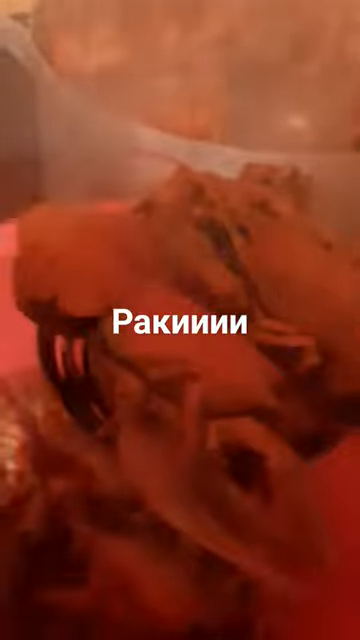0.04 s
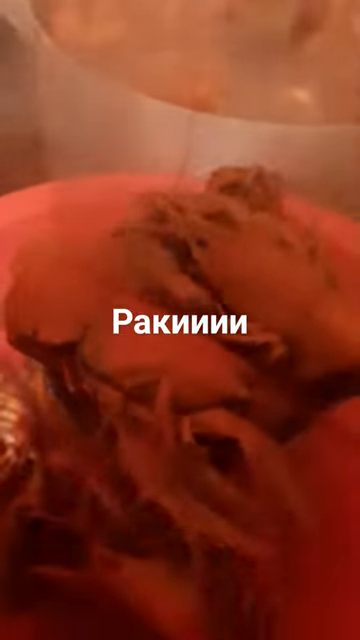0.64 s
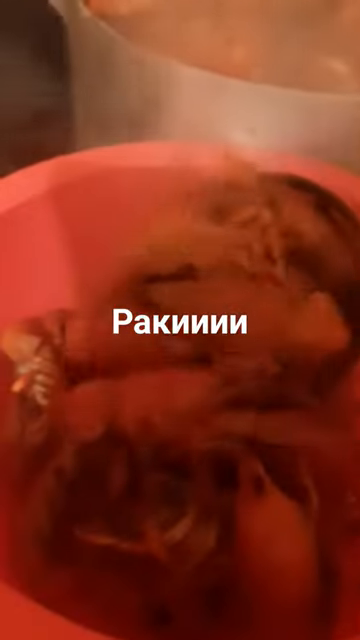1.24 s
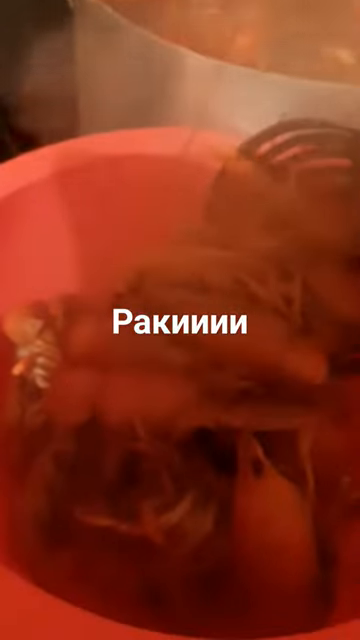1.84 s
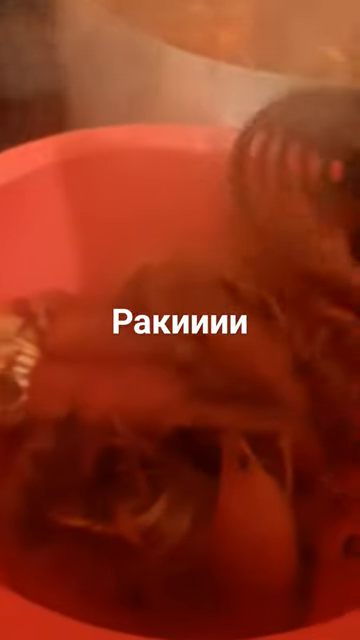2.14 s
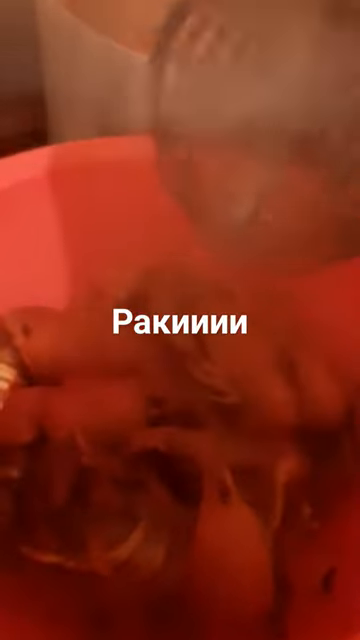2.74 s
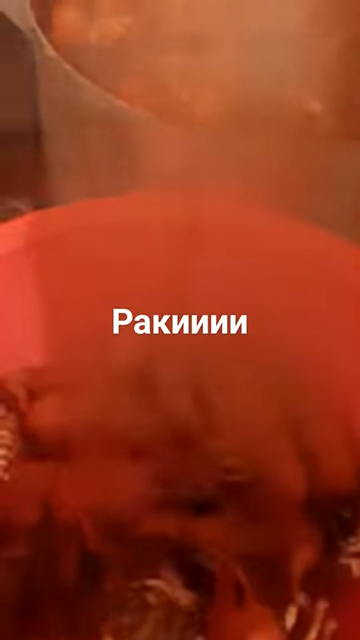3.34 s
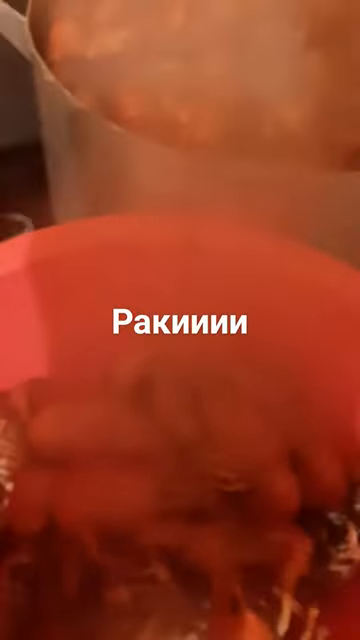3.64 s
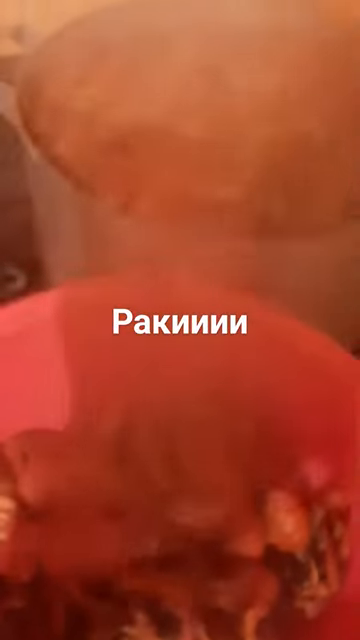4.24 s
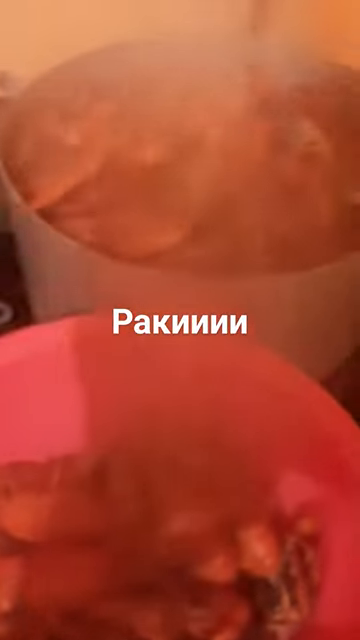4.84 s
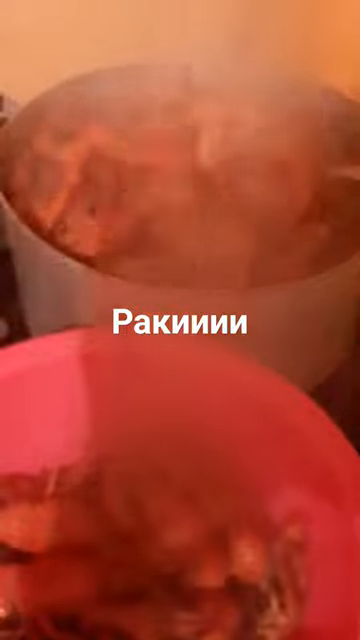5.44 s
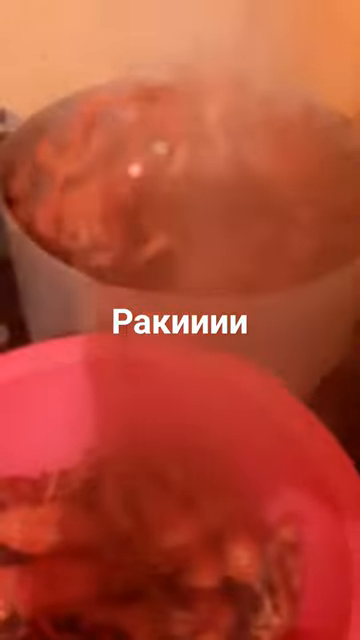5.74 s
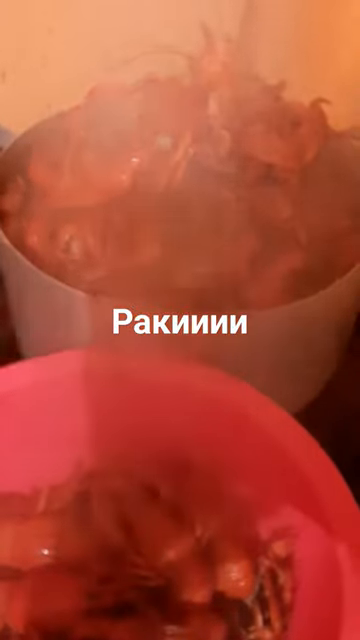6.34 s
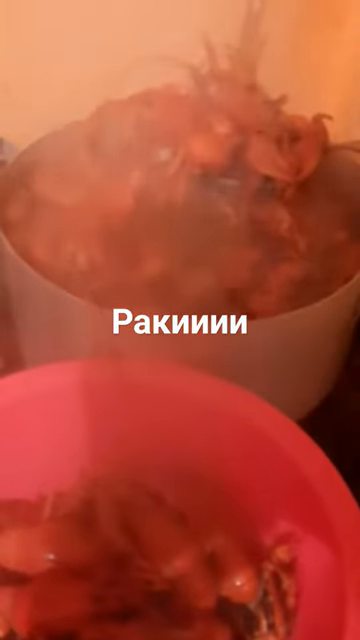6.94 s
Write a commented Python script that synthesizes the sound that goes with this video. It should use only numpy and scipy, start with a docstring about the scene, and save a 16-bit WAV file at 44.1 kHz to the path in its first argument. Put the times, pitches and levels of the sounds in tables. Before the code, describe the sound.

Crayfish shells knock sharply into a plastic bowl, followed by hollow bumps and soft wet rustling, with a stove rumbling faintly.

```python
"""A small kitchen, a stereo microphone close to a plastic bowl; a low mains hum and the stove's rumble run
throughout. First boiled crayfish slide off a steel skimmer, their wet shells rustling. They clatter into the
bowl in three bursts, one at 1.4 s and two close together near 2.4 s. From 3.4 s the loaded bowl is shifted and
bumps down a few times. Last, the skimmer digs into the pot for more, with softer rustles and ticks."""
import sys
import numpy as np
from scipy import signal
from scipy.fft import rfft, irfft
from scipy.io import wavfile
from scipy.ndimage import uniform_filter1d

SR = 44100
rng = np.random.default_rng(int(sys.argv[2]) if len(sys.argv) > 2 else 0)


def master(y):
    """Save y as 16-bit WAV."""
    cut = np.clip(np.atleast_2d(y).T, -1, 1)
    pcm = np.round(cut * 32767)  # scale
    wavfile.write(sys.argv[1], SR, pcm.astype(np.int16))


N = 317520  # 7.2 s


# Crayfish landing in the bowl, close to the microphone. Each row: start in seconds, level in dB,
# thud and crack in relative dB, shell pitch in Hz, weight on the bowl's floor in relative dB.
LANDINGS = [(1.416, -27.5, -11.5, -10.5, 1610, -28), (1.4224, -19.5, -10.5, -9, 1880, -27),
            (1.4266, -22, -4.5, -17.5, 1677, -25), (1.429, -22, -7.5, -9.5, 1604, -19),
            (1.457, -22, -16, -15.5, 1740, -25), (2.3465, -24, -5, -5, 1610, -10),
            (2.3593, -21.5, -2.5, 1, 1580, -9), (2.3737, -22, -5, -4, 1540, -11),
            (2.3955, -24.5, -6.5, -9, 1580, -13), (2.4034, -26, -6.5, -13, 1604, -14),
            (2.449, -36, -6, -15, 1200, -20), (2.4639, -24.5, -13, -20, 2060, -25),
            (2.4978, -22, -19, -9, 1816, -22.5), (2.5, -22, -20.5, -7.5, 1766, -17),
            (2.51, -23, -5.5, -10.5, 1868, -17), (2.5172, -34.5, -14.5, 2.5, 1550, -14)]
# The plastic bowl's modes. Each row: pitch in Hz, relative level in dB, time to fall 60 dB in seconds.
BOWL_MODES = [(344, 1, 0.25), (561, -2, .13), (687, -4.5, .11), (790, -3.5, 0.085), (950, -4.5, .09),
              (1250, -5.5, 0.15), (1520, 1, 0.2), (1594, -2.5, 0.09), (1900, -6.5, .1), (2043, -10.5, 0.11),
              (2780, -6, .12), (4000, -5.5, .15)]

def landings():
    """Falling crayfish strike the heap and set the bowl ringing; its floor sags under their weight."""
    hits, sag = np.zeros(N), np.zeros(N)
    for start, db, thud_db, crack_db, hz, weight_db in LANDINGS:
        add(hits, start, undb(db) * shell(thud_db, crack_db, hz))
        add(sag, start, undb(db + weight_db) * unit(band(crunch(0.12), 60, 240)))
    return hits + sag + undb(-26) * through(hits, ring(BOWL_MODES))


def shell(thud_db, crack_db, hz):
    """One contact: the hollow shell rings briefly over a knock, a soft thud and a snap."""
    modes = [(hz, 0, 0.018), (hz * 0.7, -6, 0.011), (hz * 1.22, -5, 0.012), (hz * 2.2, -9, 0.011)]
    hollow = unit(ring(modes))
    knock = unit(band(crunch(0.0099), 1000, 4000))
    thud = undb(-0.5) * unit(ring([(680, 0, 0.02)])) + undb(-3.5) * unit(band(crunch(0.023), 330, 900))
    return hollow + undb(-5) * knock + undb(thud_db) * thud + undb(crack_db) * crack(0.008)


def crack(t60):
    """The bright snap of hard shell."""
    return unit(band(crunch(t60), 3000, 21000))


# The bowl bumping down close by. Each row: start in seconds, level in dB, thud and crack in relative dB.
BOWL_BUMPS = [(3.367, -50.5, -1, 0.5), (3.388, -23.5, -1.5, -0.5), (3.392, -32.5, 4.5, -4.5),
              (3.404, -37, -5, -10), (3.531, -26, -8.5, 7), (3.5365, -24, 2, 5.5), (3.5426, -29, -7.5, -1),
              (3.5842, -20, 4, -19), (3.5908, -26.5, -8, 7), (3.6053, -20, -7, 1),
              (3.6112, -31.5, -2.5, -6), (3.8242, -26.5, 0, -4.5)]
# The loaded bowl's modes on its support.
# Each row: pitch in Hz, relative level in dB, time to fall 60 dB in seconds.
SUPPORT_MODES = [(122, -10, 0.25), (176, -7, 0.2), (210.4, 0, .23), (261.4, -7, 0.066), (325, -5, 0.058),
                 (402, 3, 0.14), (431.6, 2, 0.084), (516, -0.5, 0.085), (571, -8, 0.24), (771, -0.5, 0.1),
                 (857, -4, 0.093), (890, -4, 0.12)]

def bumps():
    """Heavy blows: the support booms, the bowl's wall knocks, and the heap crunches as it settles."""
    y, settle = np.zeros(N), 1 - fade(0.005)
    for start, db, thud_db, crack_db in BOWL_BUMPS:
        thud = unit(band(crunch(0.011), 200, 790)) + undb(0.3) * unit(ring(SUPPORT_MODES))
        wall = undb(-6) * unit(band(crunch(0.024), 1150, 1900))
        clack = unit(band(crunch(0.03), 1200, 5300)) + undb(crack_db) * crack(0.072)
        add(y, start, undb(db) * (undb(thud_db) * thud + wall + undb(1.5) * settle * clack))
    return y


# Single shells and legs snapping past each other.
# Each row: start in seconds, level in dB, scrape in relative dB, shell pitch in Hz.
SHELL_SLIPS = [(0.6967, -60, -3, 1200), (0.8958, -53.5, -1, 1520), (0.968, -41.5, -15, 1330),
               (0.9917, -46.5, -21, 970), (1.0928, -38.5, -6, 4000), (1.1152, -44, -8, 1430),
               (1.274, -44, 1, 3980), (1.3275, -47.5, -1, 1020), (1.7663, -55.5, 3, 1650),
               (1.856, -51.5, -4, 1030), (1.8931, -52, -4, 1010), (1.9331, -57, -5, 960),
               (2.1121, -46, 7, 4900), (2.2243, -43, 1, 1450), (2.278, -43, -8, 4500),
               (4.2739, -45, -22, 1020), (4.3225, -45, -7, 1580), (4.5651, -53, 2.5, 1540),
               (4.8826, -51, 0, 3670), (4.9072, -52, 12, 3830), (5.0406, -53.5, 1, 1060),
               (5.1303, -52, -3, 1590), (5.275, -44.5, 1, 1550), (5.3087, -47, 0, 1730),
               (5.3936, -52, -10, 4600), (5.4987, -55.5, 8, 1460), (5.6062, -42.5, -10, 1270),
               (5.909, -56, -8, 1405), (5.943, -64, 8, 4500), (6.015, -64, -14, 1490),
               (6.1454, -61, 4.5, 1600), (6.776, -66.5, 18, 1510)]

def slips():
    """A shell catches, snaps free with a hollow tick and scrapes on briefly."""
    y = np.zeros(N)
    for start, db, scrape_db, hz in SHELL_SLIPS:
        tick = unit(band(crunch(0.009), hz * 0.75, hz * 1.35))
        thud_db = 2.5 - 15.5 * np.log2(hz / 1040)  # big hollow parts thud, thin legs hardly do
        thud = undb(thud_db) * unit(band(crunch(0.016), 500, 950))
        scrape = undb(-4) * crack(0.007) + undb(-0.5) * crack(0.074)
        add(y, start, undb(db) * (tick + thud + undb(scrape_db) * scrape))
    return y


# Pushes that set the shells sliding.
# Each row: start, swell and time to fall 20 dB in seconds, rustle in dB, wet rubbing in dB.
HEAP_PUSHES = [(0.684, 0.024, .11, -65.5, -62), (0.884, 0.036, 0.28, -61.5, -55),
               (0.954, 0.0098, 0.15, -54.5, -50.5), (1.039, 0.022, 0.2, -56.5, -51),
               (1.18, 0.051, 0.33, -58.5, -51), (1.498, 0.012, 0.08, -53, -50),
               (1.669, 0.096, 0.59, -65.5, -65), (1.99, 0.15, 0.3137, -58, -56.5),
               (2.19, 0.13, 0.0418, -47, -47), (3.43, 0.06, 0.7, -51.5, -77), (3.64, .02, 0.1725, -47, -43),
               (3.729, 0.066, 0.0847, -51, -44), (3.89, 0.1, .5, -68.5, -59.5),
               (4.17, 0.071, 0.54, -59, -59), (4.76, 0.049, 0.66, -66, -59.5), (4.87, 0.01, 0.29, -57, -57),
               (5.125, 0.17, 0.26, -57.5, -53.5), (5.494, 0.033, 0.36, -55.5, -57),
               (5.585, 0.026, 0.01, -66, -54.5), (5.78, 0.093, 0.57, -75, -74.5),
               (6.525, 0.061, .24, -61, -78), (6.659, 0.026, 0.12, -62, -74),
               (6.775, 0.014, 0.8, -63.5, -73.5)]
# The shells' bright rustle. Each row: frequency in Hz, relative density in dB.
RUSTLE_SPECTRUM = [(900, -24), (1350, -8), (1550, 2), (1800, -4), (2570, -1), (3440, -1.5), (5150, -2),
                   (5800, -7), (7700, -6.5), (8750, -16), (10700, -6.5), (13900, -7), (15000, -9),
                   (16000, -17.5)]
# Their duller wet rubbing. Each row: frequency in Hz, relative density in dB.
RUBBING_SPECTRUM = [(150, -32), (350, 0.5), (470, -4), (620, 2), (850, -2.5), (1100, -4), (1330, -5.5),
                    (1560, 1.5), (1800, -8), (2600, -15.5)]

def sliding():
    """Wet shells rustle, rub and bubble as they move over each other."""
    rustle = colour(grains(1300, 3.4), RUSTLE_SPECTRUM) * undb(-2 + 2.2 * walk(35))
    water = bubbles(rate=31, cycles=13)
    rubbing = undb(-8.5) * (water + colour(grains(1100, 1.2), RUBBING_SPECTRUM))
    rustle_level = pushed((*timing, db) for *timing, db, _ in HEAP_PUSHES)
    rubbing_level = pushed((*timing, db) for *timing, _, db in HEAP_PUSHES)
    return rustle * rustle_level + rubbing * rubbing_level


def bubbles(rate, cycles, pitches=20):
    """Water pops between the shells, `rate` times a second at each pitch, ringing for `cycles` periods."""
    y, count = np.zeros(N), int(rate * N / SR)
    for hz in np.geomspace(380, 2400, pitches) * (1 + 0.023 * rng.standard_normal(pitches)):
        decay = np.exp(-np.log(1000) * hz / cycles / SR)
        turn = 2 * np.pi * hz / SR
        pops = np.zeros(N)
        pops[rng.integers(0, N, count)] = undb(5 * np.minimum(rng.exponential(size=count), 3.5))
        resonance = [1, -2 * decay * np.cos(turn), decay ** 2]
        y += signal.lfilter([np.sin(turn), -np.sin(turn)], resonance, pops + 1e-12)
    y = colour(y, RUBBING_SPECTRUM)
    return y / np.std(y)


# Shoves on the bowl or the pot. Each row: start, swell and time to fall 20 dB in seconds, level in dB.
VESSEL_SHOVES = [(3.39, 0.014, 0.4, -47.5), (3.6, 0.047, 0.4547, -48.5), (3.86, .05, 0.46, -54.5),
                 (4.17, 0.12, 0.34, -58.5), (4.76, 0.041, .4, -69), (5.15, 0.18, 0.02, -65),
                 (5.595, 0.016, 0.23, -66)]
# The low judder of its foot. Each row: frequency in Hz, relative density in dB.
JUDDER_SPECTRUM = [(53, -13.5), (90, 2), (160, 3.5), (210, 7), (285, -1.5), (411, 6), (470, -2), (625, -1),
                   (716, -12.5), (883, -6), (1100, -26.5), (2420, -51)]

def dragging():
    """The foot of the bowl or the pot judders over its support."""
    return colour(grains(500, 2.3), JUDDER_SPECTRUM) * pushed(VESSEL_SHOVES)


# Shells scraping off the skimmer above the bowl.
# Each row: start, swell and time to fall 20 dB in seconds, level in dB.
SKIMMER_SCRAPES = [(1.74, .03, .3, -76), (2.09, .03, 0.3, -62)]

def skimmer(hz=5000, width_hz=160):
    """Scraping keeps one narrow mode of the steel skimmer singing thinly."""
    singing = band(grains(900, 2.9), hz - width_hz / 2, hz + width_hz / 2)
    return singing / np.std(singing) * pushed(SKIMMER_SCRAPES)


# Thin whines behind the handling.
# Each row: start and length in seconds, first and last pitch in Hz, level in dB.
WHINE_GLIDES = [(3.69, 0.13, 905, 775, -49.5), (6.5, 0.214, 297, 314, -66), (6.557, 0.12, 922, 916, -80),
                (6.976, 0.25, 585, 538, -77)]

def whines():
    """Faint wavering tones that swell, glide and fade."""
    y = np.zeros(N)
    for start, length, first_hz, last_hz, db in WHINE_GLIDES:
        n = int(length * SR)
        hz = np.linspace(first_hz, last_hz, n) * (1 + 0.018 * walk(65)[:n])
        arch = np.sin(np.linspace(0, np.pi, n))
        add(y, start, undb(db) * arch * np.sin(2 * np.pi * np.cumsum(hz) / SR))
    return y


# The stove's rumble and hiss in the background. Each row: frequency in Hz, relative density in dB.
STOVE_SPECTRUM = [(25, -30), (42, -16), (53, -3), (68, -1.5), (90, -4.5), (130, -9.5), (260, -17),
                  (410, -15), (600, -26.5), (1200, -33), (1550, -27.5), (1900, -32), (9000, -38),
                  (15000, -30)]
# Mains hum in the room. Each row: pitch in Hz, level in dB.
MAINS_HUM = [(100, -72)]

def stove():
    """A throbbing low rumble and mains hum in the centre, with a faint hiss spread wide."""
    t = np.arange(N) / SR
    throb_spectrum = [(30, -46), (45, -10), (53, -4), (61, -6.5), (75, -16.5), (110, -31.5), (300, -88)]
    throb = undb(-70.5) * colour(rng.standard_normal(N), throb_spectrum) + swells()
    rumble = colour(rng.standard_normal(N), STOVE_SPECTRUM) * undb(-71 + 0.5 * walk(1.7))
    air = colour(rng.standard_normal(N), STOVE_SPECTRUM)
    side = undb(-75.5) * band(air, 700, 18000) + undb(-76.5) * air
    hum = sum(undb(db) * np.sqrt(2) * np.sin(2 * np.pi * hz * t + 0.22 * walk(2.1))
              for hz, db in MAINS_HUM)
    mid = throb + rumble + hum
    return np.array([mid + side, mid - side])


# Soft low booms rising out of the rumble. Each row: time of the peak in seconds, level in dB, pitch in Hz.
RUMBLE_SWELLS = [(0.33, -61.5, 65.1), (0.52, -57, 52.8), (0.74, -53, 64.8), (1.13, -63, 52.55),
                 (1.29, -60.5, 52.3), (1.47, -59.5, 53.35), (1.78, -58, 53.05), (2.1, -64, 52.7),
                 (2.37, -54.5, 60.9), (2.55, -56, 53.3), (3.63, -48, 57), (3.88, -48, 52.97),
                 (3.97, -49, 52.8), (4.14, -55.5, 53.8), (4.46, -59, 52.8), (4.57, -55, 53.6),
                 (5.13, -59, 53.15), (5.65, -61, 52.8), (5.99, -61, 53)]

def swells(width_s=0.045):
    """The deep rumble rises briefly to a soft boom."""
    y, t = np.zeros(N), np.arange(SR // 2) / SR
    bell = np.exp(-0.5 * ((t - t.mean()) / width_s) ** 2)
    for peak, db, hz in RUMBLE_SWELLS:
        tone = np.sqrt(2) * np.sin(2 * np.pi * (hz * t + rng.random()))
        add(y, peak - t.mean(), undb(db) * bell * tone)
    return y


# The small kitchen's reverberation. Each row: frequency in Hz, time to fall 60 dB in seconds.
KITCHEN_DECAY = [(150, 0.28), (600, 0.23), (2000, 0.17), (6000, 0.16), (14000, 0.23)]

def kitchen(x, room_db, bowl_db, lead_s):
    """Sound reaches the microphone's left side first; echoes follow off the bowl and the room's walls."""
    edges_hz = [30, 250, 500, 1000, 2000, 4000, 8000, 20000]
    hop, tail = SR // 5, SR // 4
    f = np.fft.rfftfreq(2 * SR, 1 / SR)
    noise, bands = rfft(rng.standard_normal((2, 2 * SR))), []
    for lo, hi in zip(edges_hz, edges_hz[1:]):
        hz = np.sqrt(lo * hi)
        mid, side = irfft(noise * ((f >= lo) & (f < hi)))
        apart = min(0.1 + (hz / 800) ** 2, 1)  # both sides hear nearly the same bass
        mid, side = mid * np.sqrt(2 - apart ** 2), side * apart
        walls = fade(at(KITCHEN_DECAY, hz)) * (1 - fade(0.03))
        bands.append((np.array([mid + side, mid - side]), undb(room_db) * walls / np.linalg.norm(walls)))
    direct = np.array([x * undb(1.35), np.roll(x, round(lead_s * SR)) * undb(-1.84)])
    y = direct + undb(bowl_db) * bowl_echoes(x)
    window = np.sin(np.linspace(0, np.pi, 2 * hop))
    for i in range(0, N, hop):  # the room's echoes change as things move
        offset, piece = rng.integers(SR), x[i:i + 2 * hop]
        response = sum(pair[:, offset:offset + tail] * shape[:tail] for pair, shape in bands)
        echoes = signal.fftconvolve((piece * window[:len(piece)])[None], response)[:, :N - i]
        y[:, i:i + echoes.shape[1]] += echoes
    return y


def bowl_echoes(x, t60=0.013, low_hz=930):
    """Short, bassless echoes off the bowl's wall: every shell lies elsewhere, so they keep changing."""
    hop = SR // 60
    pieces = np.pad(band(x, low_hz, 19000), (0, -N % hop)).reshape(1, -1, hop)
    response = rng.standard_normal((2, pieces.shape[1], hop)) * fade(t60)[:hop]
    response /= np.linalg.norm(response, axis=2, keepdims=True)
    echoes = signal.fftconvolve(pieces, response, axes=2)
    echoes[:, 1:, :hop - 1] += echoes[:, :-1, hop:]  # each tail spills into the next piece
    return echoes[:, :, :hop].reshape(2, -1)[:, :N]


def pushed(rows, break_loose_s=0.01, gather_db=6, settle_curve=1.354):
    """Envelope of pushes: things break loose, gather speed, then come to rest ever faster; powers add."""
    power, t = np.zeros(N), np.arange(2 * SR) / SR
    onset = np.minimum(t / break_loose_s, 1)
    for start, swell_s, fall_s, db in rows:
        rise_db = -gather_db * np.maximum(1 - t / swell_s, 0)
        fall_db = -20 * (np.maximum(t - swell_s, 0) / fall_s) ** settle_curve
        add(power, start, (onset * undb(db + rise_db + fall_db)) ** 2)
    return np.sqrt(power)


def ring(modes):
    """Impulse response of (Hz, dB, t60) modes, with unit energy."""
    y = np.zeros(SR // 2)
    for hz, db, t60 in modes:
        t = np.arange(min(int(2 * t60 * SR), len(y))) / SR
        detuned = hz * (1 + 0.0024 * rng.standard_normal())  # the load shifts from blow to blow
        envelope = undb(db) * fade(t60)[:len(t)]
        y[:len(t)] += rng.choice([-1, 1]) * envelope * np.sin(2 * np.pi * detuned * t)
    return y / np.sqrt(np.sum(y ** 2))


def grains(rate, spread_db):
    """Tiny clicks of unequal size, about `rate` a second, rms 1."""
    size = undb(spread_db * np.minimum(rng.exponential(size=N), 4))
    clicks = (rng.random(N) < rate / SR) * size * rng.choice([-1, 1], N)
    return clicks / np.std(clicks)


def crunch(t60):
    """A dying burst of tiny contacts."""
    return rng.standard_normal(SR // 2) * fade(t60)


def fade(t60):
    """Half a second of exponential decay, falling 60 dB in t60 seconds."""
    return np.exp(-np.log(1000) * np.arange(SR // 2) / SR / t60)


def walk(rate):
    """Smooth random drift, `rate` steps a second, with a spread near 1."""
    hold = int(SR / rate)
    steps = np.repeat(rng.standard_normal(N // hold + 1), hold)
    return np.sqrt(2) * uniform_filter1d(uniform_filter1d(steps, hold), hold)[:N]


def colour(x, points):
    """Give x a (Hz, dB) spectrum, keeping the power of a white input."""
    gain = undb(at(points, np.fft.rfftfreq(x.shape[-1], 1 / SR)))
    return irfft(rfft(x) * gain / np.sqrt(np.mean(gain ** 2)), x.shape[-1])


def at(points, hz):
    """Read (Hz, value) points on a log-frequency axis."""
    f, value = np.transpose(points)
    return np.interp(np.log(hz + 1), np.log(f), value)


def band(x, lo_hz, hi_hz):
    """Causal band-pass."""
    sos = signal.butter(2, [lo_hz, min(hi_hz, 0.45 * SR)], "band", fs=SR, output="sos")
    return signal.sosfilt(sos, x + 1e-18)


def through(x, response):
    """Convolve, keeping the length."""
    return signal.fftconvolve(x, response)[:N]


def unit(x):
    """Scale to the energy of one millisecond at full level."""
    return x * np.sqrt(SR / 1000 / np.sum(x ** 2))


def undb(db):
    """Decibels to gain."""
    return 10 ** (np.asarray(db) / 20)


def add(track, start_s, sound):
    """Mix a sound in at a time."""
    i = int(start_s * SR)
    track[i:i + len(sound)] += sound[:N - i]


def scene():
    """The bowl is close to the microphone, a little left; the rustling spreads further into the room."""
    clatter = kitchen(landings() + slips(), room_db=-5.5, bowl_db=0.5, lead_s=0.00014)
    blows = kitchen(bumps(), room_db=-3.5, bowl_db=1, lead_s=0.00016)
    handling = sliding() + skimmer() + dragging() + whines()
    return clatter + blows + kitchen(handling, room_db=-2, bowl_db=2.5, lead_s=0.00014) + stove()


def record(dry):
    """The microphone loses the deepest bass, dips near 9 kHz and cuts the top above 15.8 kHz."""
    response = [(30, -11), (48, -0.5), (7600, 0), (8800, -4.5), (10500, -0.5), (15000, -3.5)]  # Hz, dB
    heard = irfft(rfft(dry) * undb(at(response, np.fft.rfftfreq(N, 1 / SR))), N)
    return signal.sosfilt(signal.ellip(8, 0.2, 70, 15800, fs=SR, output="sos"), heard)


dry = scene()
out = record(dry)
master(out)
```